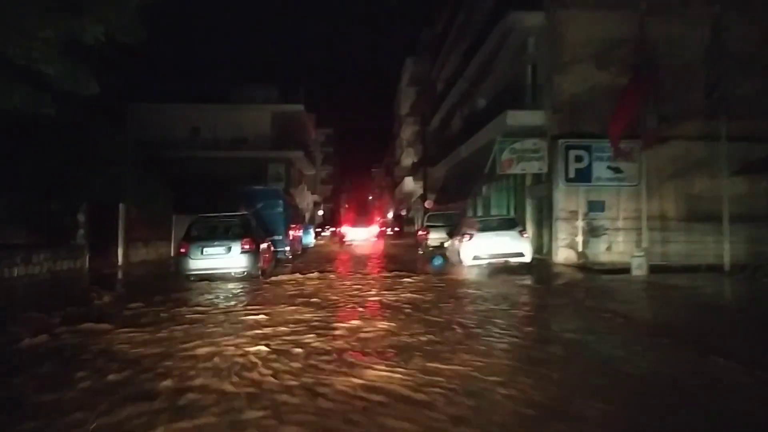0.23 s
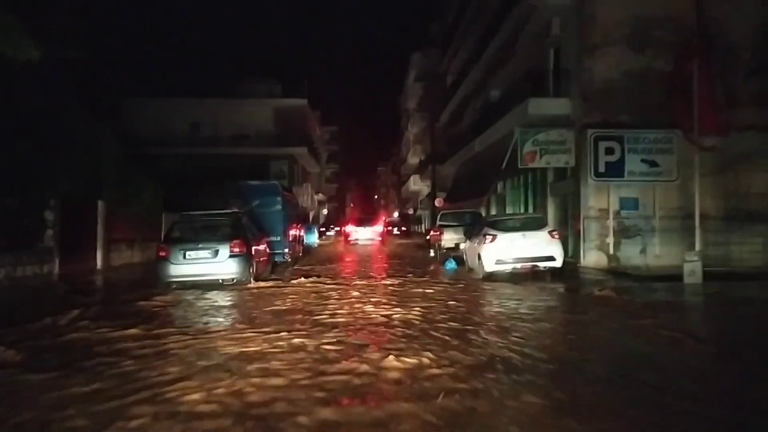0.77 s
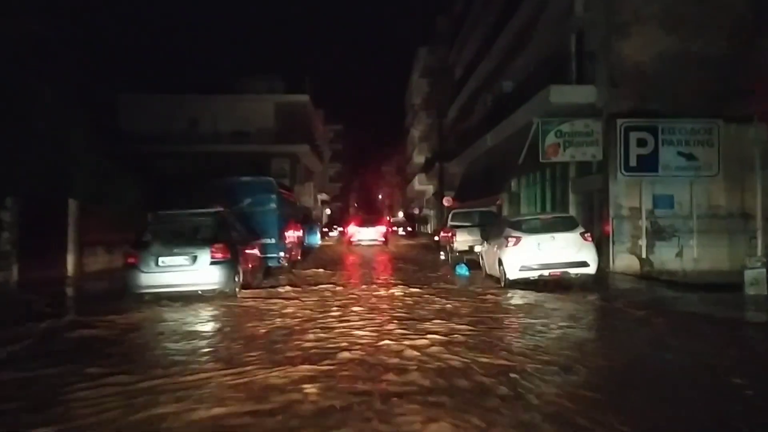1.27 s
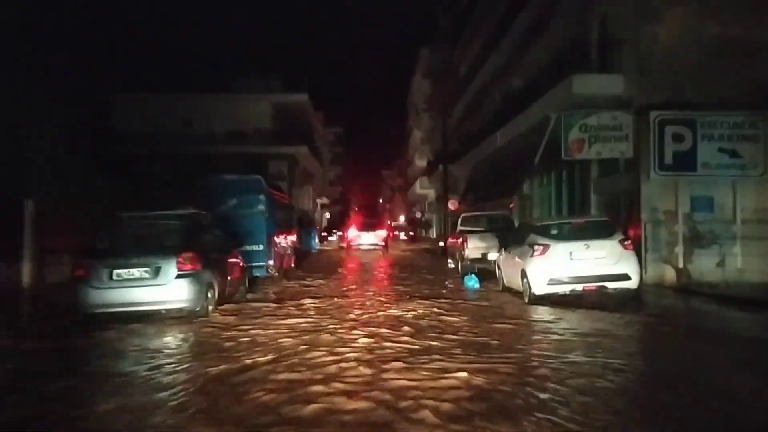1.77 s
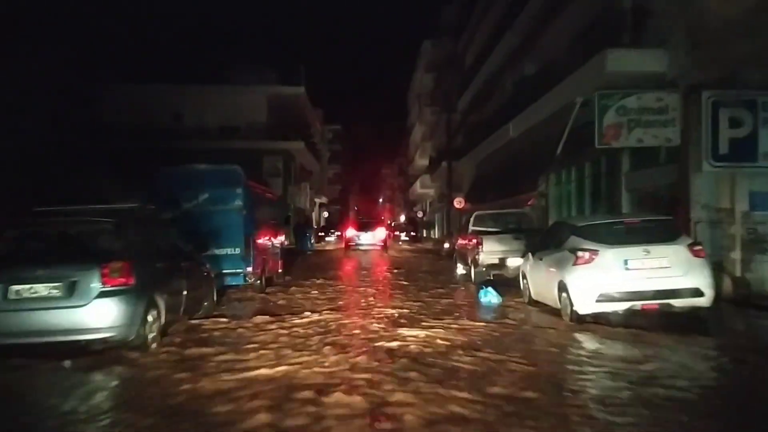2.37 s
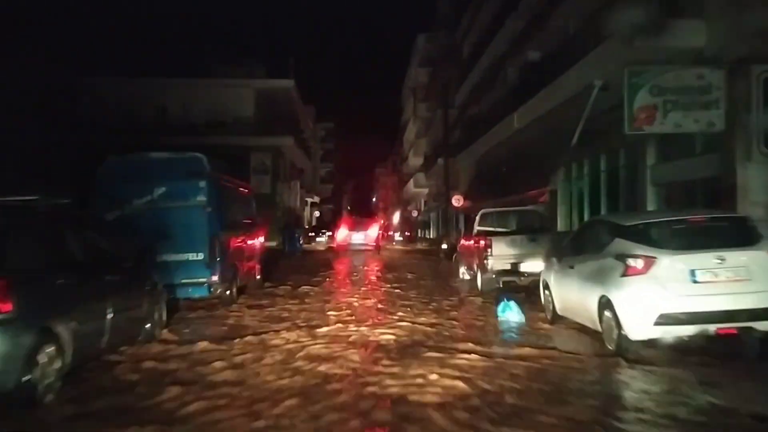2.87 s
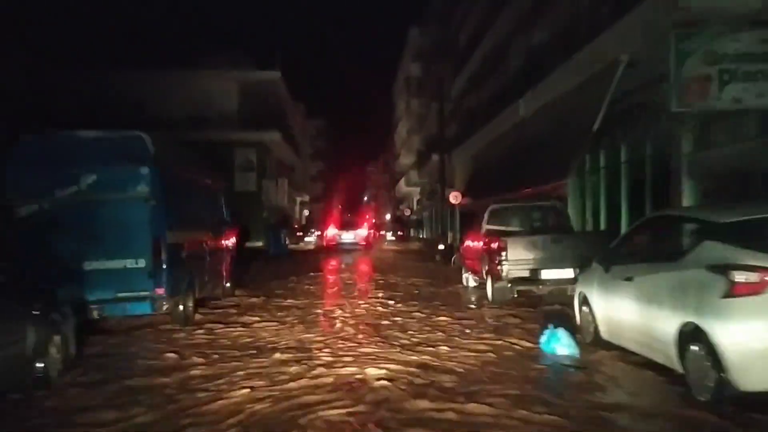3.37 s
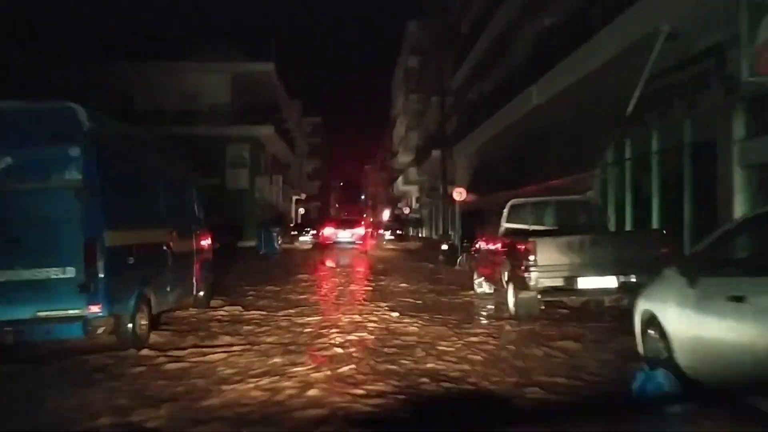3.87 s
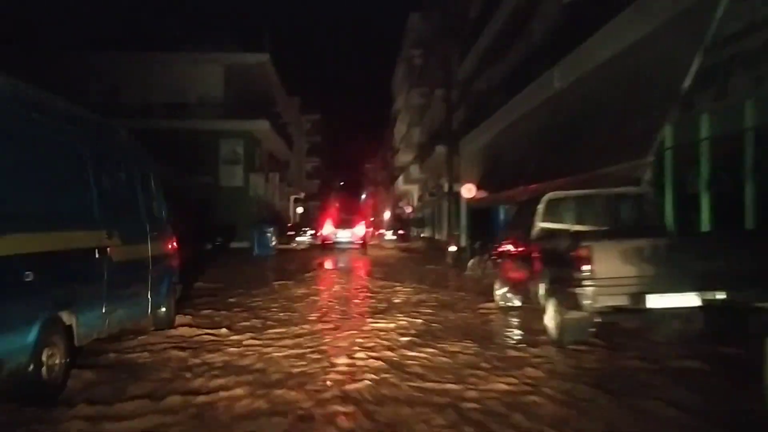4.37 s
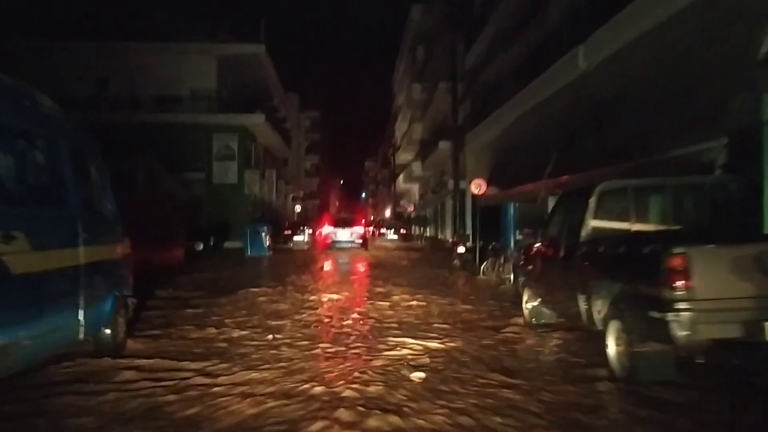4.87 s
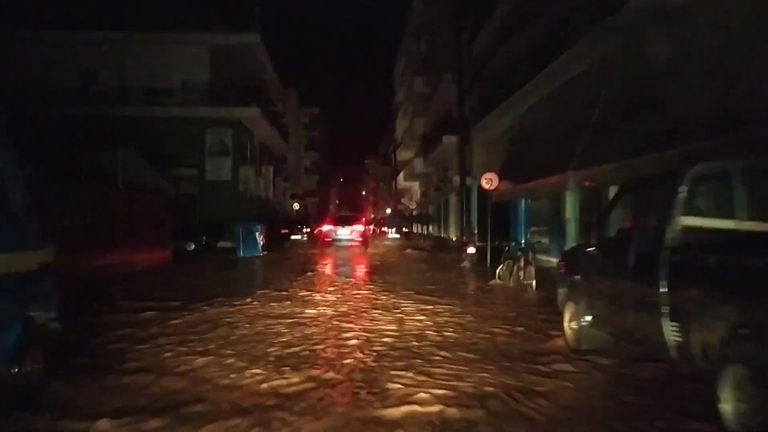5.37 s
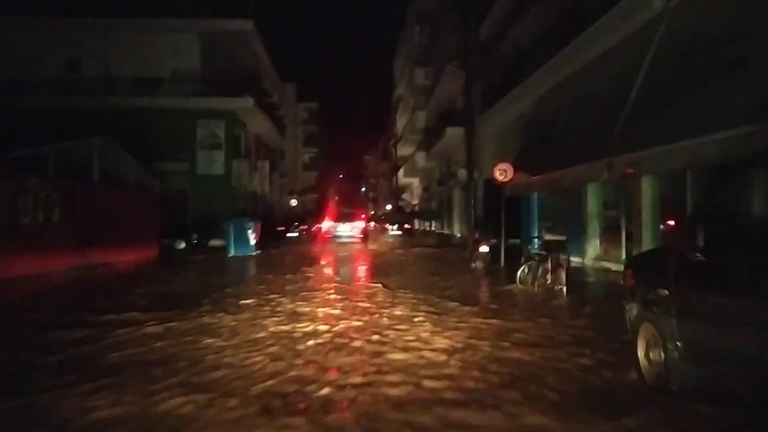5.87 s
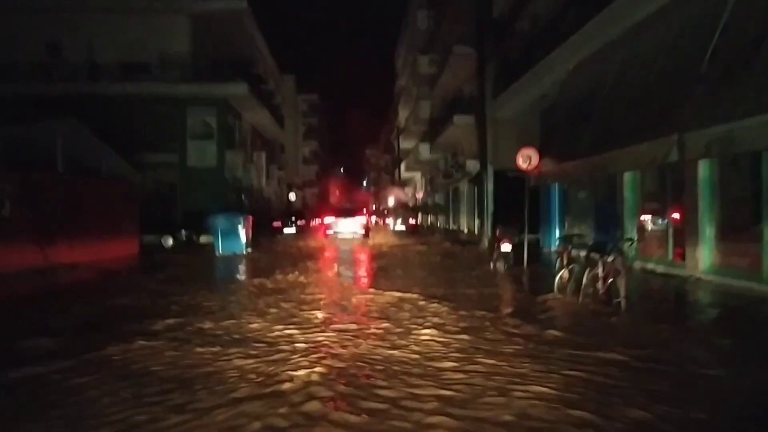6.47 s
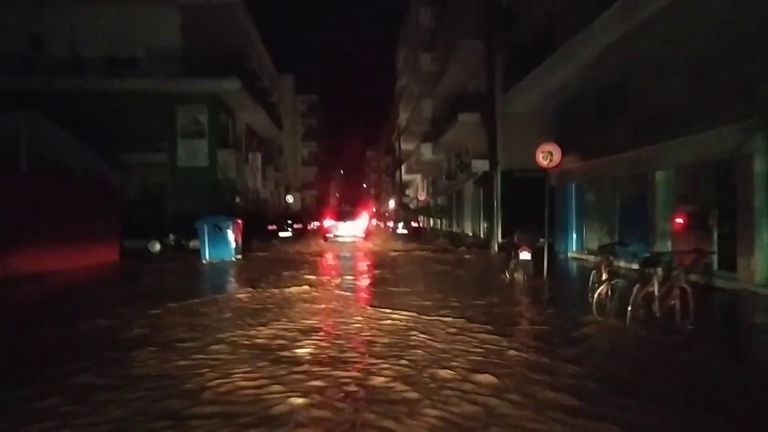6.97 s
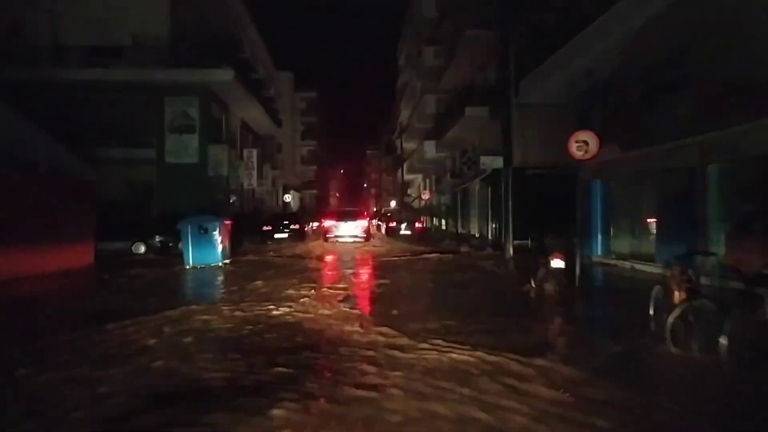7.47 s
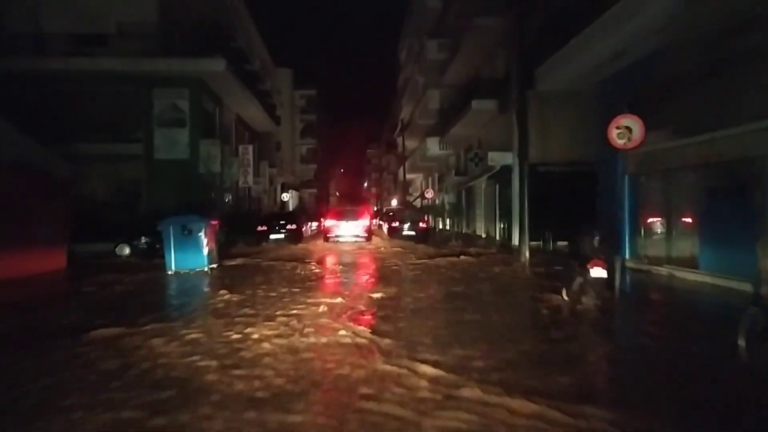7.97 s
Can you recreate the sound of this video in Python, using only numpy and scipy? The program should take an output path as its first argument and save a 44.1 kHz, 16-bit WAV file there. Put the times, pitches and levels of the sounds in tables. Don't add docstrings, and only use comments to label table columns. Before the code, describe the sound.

Muffled car interior: deep engine hum, regular wiper thuds and rubbery stutters, floodwater sloshing and softly hissing along the doors and floor.

```python
import sys
import numpy as np
from scipy import signal
from scipy.fft import rfft, irfft, next_fast_len
from scipy.io import wavfile
from scipy.ndimage import uniform_filter1d, map_coordinates

SR = 44100
rng = np.random.default_rng(int(sys.argv[2]) if len(sys.argv) > 2 else 0)


def decibels_to_gain(level_db):
    exponent = np.asarray(level_db, float) / 20
    return 10 ** exponent


def put_to_file(sound):
    columns = np.atleast_2d(sound).T
    safe = np.clip(columns, -1, 1)
    whole_steps = np.round(safe * 32767)
    wavfile.write(sys.argv[1], SR, whole_steps.astype(np.int16))


N = 362943


def unit(x):
    return x / np.sqrt(np.mean(x ** 2) + 1e-20)


def along(points, hz):
    f, v = np.transpose(points)
    return np.interp(np.log(hz + 1), np.log(f + 1), v)


def curves(rows):
    s, *cols = np.transpose(rows)
    return [np.interp(np.arange(N) / SR, s, c) for c in cols]


def wobble(rate_hz):
    knots = rng.standard_normal(int(N * 60 / SR))
    return map_coordinates(knots, [np.arange(N) * rate_hz / SR])


def bells(middle_s, length_s):
    offset_s = np.arange(N) / SR - np.reshape(middle_s, (-1, 1))
    return (offset_s / (np.reshape(length_s, (-1, 1)) / 2)) ** 2


def filtered(x, response):
    m = next_fast_len(N + SR // 2)
    return irfft(rfft(x, m) * response(np.fft.rfftfreq(m, 1 / SR)), m)[..., :N]


def add(track, s, modes, attack_s):
    t = np.arange(SR // 3) / SR
    ring = sum(decibels_to_gain(db - 60 * t / t60_s) * np.sin(2 * np.pi * hz * t) for hz, db, t60_s in modes)
    start = round(s * SR)
    track[..., start:start + len(t)] += ring * (1 - np.exp(-t / attack_s))


def burst(track, events, spectrum, t60_s, attack_s):
    t, shape = np.arange(SR // 4) / SR, np.zeros(len(track))
    for s, db in events:
        shape[round(s * SR):][:len(t)] += decibels_to_gain(db - 60 * t / t60_s) * (1 - np.exp(-t / attack_s))
    pair = rng.standard_normal(N) + 1.6 * rng.standard_normal((2, N))
    return track[:N] + shape[:N] * unit(filtered(pair, lambda hz: decibels_to_gain(along(spectrum, hz))))


# f/Hz, correlation/1
LIKENESS = [(60, .997), (130, .93), (270, .86), (600, .4), (1250, .4), (2500, .28), (5000, .2), (12000, .2)]


def rush(spectrum, patchy_db, drops_db=-60):
    n = N + 2048
    drops = np.zeros((2, n))
    when, left, right, size = rng.random((4, 4000))
    drops[:, (when * n).astype(int)] = np.array([left - .5, right - .5]) * decibels_to_gain(11.0 * size)
    noise = rng.standard_normal((2, n)) + decibels_to_gain(drops_db) * unit(drops)
    z = signal.stft(noise, nperseg=512)[2]
    field = uniform_filter1d(rng.standard_normal(z.shape[1:]), size=8, axis=0)
    field = uniform_filter1d(field, size=8, axis=1)
    pair = signal.istft(z * decibels_to_gain(patchy_db * unit(field)), nperseg=512)[1][:, :N]

    def colour(hz):
        turn = np.arccos(np.clip(along(LIKENESS, hz), -1, 1)) / 2
        return decibels_to_gain(along(spectrum, hz)) * [np.cos(turn), np.sin(turn)]

    mid, side = filtered(pair, colour)
    return np.array([mid + side, mid - side]) / np.std(mid)


# t/s, f/Hz, level/dB
FIRING = [(0.0, 59, -27), (0.07, 60.2, -28.5), (0.2, 55.5, -25.5), (0.38, 54, -26.5), (0.75, 53.56, -24),
          (1.0, 54.75, -30), (1.7, 53.43, -26.5), (2.3, 55.42, -27.5), (3.2, 56.32, -31),
          (3.9, 54.3, -26.5), (4.7, 50.8, -34), (5.2, 49.65, -49), (5.7, 49.2, -34.5), (6.85, 48.3, -36.5),
          (7.3, 49.2, -42), (8.23, 48.45, -37)]


def engine():
    hz, first_db = curves(FIRING)
    second_db = -41 - 0.13 * np.abs(hz - 51.3)
    drag = uniform_filter1d(np.minimum(decibels_to_gain(grip() + 27.5), 1), size=int(0.37 * SR))
    second_db = second_db + 7 * drag
    turn = 2 * np.pi * np.cumsum(hz * (1 + 0.0027 * wobble(12))) / SR
    lumpy_db = 0.7 + 0.22 * np.clip(-22 - first_db, 0, 12)
    first = decibels_to_gain(first_db + lumpy_db * wobble(24.098)) * (np.sin(turn) + 0.045 * np.sin(turn / 2))
    second = decibels_to_gain(second_db + 0.57 * wobble(13)) * (np.sin(2 * turn + 1) + 0.42 * np.sin(3 * turn))
    return np.sqrt(2) * (first + second)


# t/s, level/dB, ring f/Hz, low thud level/dB, click level/dB
PARK_THUMPS = [
    (0.287, -17.5, 249, 0, -25.5),
    (1.716, -16, 240, 0.5, -26),
    (3.146, -20, 220, -8, -24.5),
    (4.552, -16.5, 278, -11, -25.5),
    (5.979, -17, 272.8, 0.5, -27),
    (7.384, -19.5, 268.4, -13, -23.5),
]
# t/s, level/dB, ring f/Hz, low knock level/dB, bounce delay/s
BLADE_FLIPS = [
    (1.004, -32, 594, 8, 0.047),
    (2.435, -30.5, 584, 12, 0.013),
    (3.849, -22.5, 603, 0, 0.036),
    (5.269, -24, 696, 7, 0.03),
    (6.684, -37, 510, -1, 0.019),
    (8.113, -30, 596, 4, 0.023),
]
# t/s, level/dB, ring f/Hz, ring over rest/dB
FLIP_SNAPS = [
    (1.006, -40, 1740, 0),
    (2.431, -35, 1250, 4),
    (3.848, -29.5, 1300, 9),
    (5.263, -29, 1140, 10),
    (6.678, -33, 1980, -4),
    (8.108, -39, 1860, 4),
]
# f/Hz, level/dB per Hz
SCRAPE = [(350, -24), (650, 0), (1150, -5), (1600, -12), (2400, -17), (4000, -40)]
# f/Hz, level/dB per Hz
SCUTTLE_PANEL = [(60, -30), (110, -17), (200, -1), (280, 18.5), (400, -29), (700, -1.5), (1500, -27),
                 (4000, -35), (9000, -56)]
# f/Hz, level/dB per Hz
LINKAGE = [(300, -25), (700, 11.5), (1500, 4), (2200, -0.5), (3000, -8), (4200, -6.5), (6500, -15),
           (10000, -56)]
# f/Hz, level/dB per Hz
SLAP_SKIN = [(120, -36), (200, -6), (400, -2), (620, -8), (1000, -7), (1400, -23), (2300, -38), (4000, -37),
             (9000, -76)]


def wipers():
    park, flip = np.zeros((2, N + SR))
    for s, db, hz, thud_db, click_db in PARK_THUMPS:
        panel = [(hz, db + 1.5, .13), (hz * 0.677, db - 5, .12), (hz * 1.164, db - 5, .09),
                 (hz * 1.55, db - 9.5, .06), (570, db - 17.5, .08)]
        add(park, s, panel, attack_s=0.0019)
        add(park, s + 0.0199, [(103.7, db + thud_db, 0.14)], attack_s=0.014)
        tick = [(3930, db + click_db - 15, .015), (3930 * 1.12, db + click_db - 13, .012)]
        add(park, s - 0.0072, tick, attack_s=.0004)
    for s, db, hz, low_db, bounce_s in BLADE_FLIPS:
        knock = [(hz, db + 1.5, .055), (hz * 0.77, db + 3, .035), (hz * 0.594, db - 10, .035),
                 (275, db + low_db + 2, .045)]
        add(flip, s, knock, attack_s=0.0036)
        add(flip, s + bounce_s, [(690, db - 7, 0.03)], attack_s=0.0023)
    for s, db, hz, ring_db in FLIP_SNAPS:
        snap = [(960, db - 5, .03), (hz, db + ring_db, .032), (1650, db - 8, .03), (2180, db - 10, .03)]
        add(flip, s, snap, attack_s=0.0059)
    scrapes = [(s, db - 5) for s, db, *_ in FLIP_SNAPS]
    rattles = [(s - .003, db - 16) for s, db, *_ in PARK_THUMPS]
    clicks = [(s - .0075, db + click_db + 5) for s, db, _, _, click_db in PARK_THUMPS]
    slaps_over = [(s - .002, db - 8) for s, db, *_ in BLADE_FLIPS]
    park = burst(park, rattles, SCUTTLE_PANEL, t60_s=0.2, attack_s=0.0017)
    click = burst(np.zeros(N + SR), clicks, LINKAGE, t60_s=0.038, attack_s=0.00061)
    scrape = burst(np.zeros(N + SR), scrapes, SCRAPE, t60_s=0.055, attack_s=0.0036)
    return park + click + scrape + burst(flip, slaps_over, SLAP_SKIN, t60_s=0.11, attack_s=0.0015)


# middle t/s, length/s, level/dB, slip f/Hz
JUDDER_BOUTS = [(0.41, 0.075, -22, 72.5), (0.54, 0.12, -33, 70.6), (0.643, 0.1, -22.5, 76.9),
                (0.749, 0.15, -22, 82.8), (1.85, 0.076, -24.5, 72.84), (1.972, 0.063, -23.5, 69.9),
                (2.152, 0.22, -28, 83.6), (3.194, 0.041, -26.5, 77.8), (3.288, 0.069, -24, 75.1),
                (3.4, 0.072, -45, 71.5), (4.682, 0.1, -26, 69.6), (4.77, 0.13, -25, 72.6),
                (4.835, 0.067, -20, 74), (6.085, 0.12, -24, 85.85), (6.233, 0.049, -52, 77),
                (7.51, 0.13, -25, 80.7), (7.61, 0.24, -25.5, 72.3), (7.696, 0.081, -32, 72),
                (7.763, 0.071, -22, 85.14), (7.93, 0.063, -39, 82.9)]


def grip():
    s, length_s, peak_db, _ = np.transpose(JUDDER_BOUTS)
    return np.max(peak_db[:, None] - 10 * bells(s, length_s), axis=0)


# f/Hz, level/dB
WINDSCREEN = [(40, -37), (75, -5), (150, 8), (190, -4.5), (260, -24), (500, -120)]
# f/Hz, level/dB
WIPER_ARM = [(100, -57), (170, 11), (215, 7.5), (290, -23), (450, -31), (900, -56), (2000, -120)]


def judder():
    s, *_, slip_hz = np.transpose(JUDDER_BOUTS)
    level_db = grip()
    hz = np.interp(np.arange(N) / SR, s, slip_hz)
    arm_db = -6.5 - 0.79 * np.clip(level_db + 27, -20, 9)
    cycles = np.cumsum(hz * (1 + .03 * wobble(40))) / SR
    slips = np.diff(np.floor(cycles), prepend=0) * decibels_to_gain(2.0 * rng.standard_normal(N))

    def shake(body):
        return unit(filtered(slips, lambda f: decibels_to_gain(along(body, f)) * np.exp(-1j * f / 90)))

    return decibels_to_gain(level_db - 11) * (shake(WINDSCREEN) + decibels_to_gain(arm_db) * shake(WIPER_ARM))


# peak t/s, level/dB,
# ring f/Hz
BLADE_GRABS = [(0.026, -26.5, 167), (0.131, -33, 198), (0.327, -20, 104.6), (0.418, -22.5, 151.6),
               (0.419, -30, 296), (0.459, -25, 157), (0.492, -31, 143.6), (0.535, -20, 153.6),
               (0.576, -23, 156), (0.59, -23.5, 217), (0.639, -13.5, 153.5), (0.641, -32, 287),
               (0.687, -27.5, 252), (0.711, -19, 165.3), (0.738, -22.5, 166.4), (0.785, -25, 164),
               (1.431, -24.5, 158.2), (1.952, -25.5, 220.5), (1.968, -37, 130), (1.983, -33.5, 217),
               (1.993, -25, 142), (2.015, -32.5, 215), (2.157, -28, 251.5), (2.462, -30.5, 125.5),
               (2.465, -33, 295), (2.492, -27, 160), (3.178, -26.8, 288), (3.19, -21.5, 172),
               (3.277, -27, 153.3), (4.595, -27.5, 254), (4.595, -20.5, 108.2), (4.629, -30, 281),
               (4.667, -28.5, 133), (4.687, -29.5, 300), (4.707, -25, 215.2), (4.743, -25, 152),
               (4.752, -27.5, 227.4), (4.772, -35.3, 382), (4.783, -22.9, 145), (4.789, -22, 218),
               (4.841, -23.5, 152), (6.109, -28, 152), (6.513, -25, 160), (7.413, -20, 104.7),
               (7.423, -25.5, 216), (7.488, -23, 166), (7.518, -28, 142.2), (7.548, -24.5, 91),
               (7.565, -28, 145), (7.615, -21, 150.6), (7.65, -26.5, 217.5), (7.658, -26, 141),
               (7.681, -27.5, 222), (7.693, -31, 142), (7.755, -23.5, 158), (8.037, -30.5, 341),
               (8.067, -29, 277), (8.108, -28, 132), (8.127, -34, 330), (8.127, -32, 260)]


def grabs():
    out, rise_s = np.zeros(N + SR), 0.012
    for s, db, hz in BLADE_GRABS:
        add(out, s - 1.203 * rise_s, [(hz, db + 8, .13)], attack_s=rise_s)
    return out[:N]


# t/s, level/dB, spring f/Hz, knock level/dB
WHEEL_DROPS = [
    (6.377, -13, 27.7, -10),
]


def bumps():
    out = np.zeros(N + SR)
    for s, db, hz, knock_db in WHEEL_DROPS:
        knock = db + knock_db
        add(out, s, [(hz, db, .65)], attack_s=0.0058)
        axle = [(345, knock + 5.5, 0.088), (240, knock - 10, 0.15), (179.3, knock + 2, 0.23)]
        add(out, s + 0.0036, axle, attack_s=0.0039)
    return -out[:N]


# t/s, level/dB
DOOR_SLAPS = [
    (0.409, -34),
    (1.048, -54),
    (1.623, -51),
    (4.441, -50),
    (4.685, -35),
    (5.219, -52),
    (7.925, -27),
    (8.066, -32),
]
# t/s, level/dB
WATER_SHEETS = [(.06, -58), (.47, -55), (.6, -59), (1.9, -54.5), (3.31, -56), (4.31, -59), (4.73, -54),
                (6.16, -56.5), (7.56, -61)]
# f/Hz, level/dB per Hz
SHEET_HISS = [(2500, -36), (4500, -7), (7000, -12.5), (9300, -7), (11000, -17), (12500, -23), (15000, -62)]
# t/s, level/dB, ring f/Hz
DOOR_PLOPS = [
    (0.284, -34, 586),
    (1.048, -39, 690),
    (1.623, -40, 620),
    (1.71, -37, 600),
    (3.1647, -52, 3770),
    (4.441, -39, 639.4),
    (4.685, -34, 616),
    (5.219, -32, 515),
    (8.066, -33, 688.8),
]
# t/s, level/dB, ring f/Hz
FLOOR_SLOPS = [(1.071, -39, 226), (1.263, -23, 154), (2.299, -25, 150.6), (2.667, -26, 273),
               (2.817, -25, 183), (3.483, -21, 185), (3.523, -28, 203), (3.83, -28, 202), (3.992, -31, 211),
               (4.281, -25, 186), (4.815, -24, 151.7), (5.011, -33, 243), (5.182, -24, 187),
               (5.729, -37.5, 345), (5.769, -29, 183), (6.802, -37, 223), (7.895, -25, 151)]


def slaps():
    plops = np.zeros(N + SR)
    for s, db, hz in DOOR_PLOPS:
        add(plops, s, [(hz, db + 0.5, .04)], attack_s=0.0019)
    for s, db, hz in FLOOR_SLOPS:
        add(plops, s, [(hz, db + 2, 0.13)], attack_s=.005)
    hits = burst(plops, [(s, db - 4) for s, db in DOOR_SLAPS], SLAP_SKIN, t60_s=0.11, attack_s=0.0017)
    return hits + burst(np.zeros(N + SR), WATER_SHEETS, SHEET_HISS, t60_s=0.41, attack_s=0.011)


# t/s, level/dB, ring f/Hz, broad crack level/dB, left over right/dB
CLIP_TICKS = [(0.092, -56, 9000, -2.5, -3), (0.512, -58, 8800, -6, -5), (0.611, -53, 8400, -3.5, -2),
              (0.155, -50, 9300, -19, -12), (0.4733, -53, 9540, -8, -14), (0.721, -44, 9530, -12, -18.5),
              (0.8076, -49, 9350, -11, -12), (0.9842, -48, 9460, -14, -10), (1.1477, -50.5, 9336, -7, -3),
              (1.4081, -49, 9440, -12, -19), (1.5508, -45.5, 9580, -16, -17), (1.6404, -52, 9400, -11, -12),
              (1.8287, -46, 9480, -17, -15), (2.437, -50, 9600, -14, -13), (3.29, -47.5, 9620, -14, -19),
              (3.4385, -48, 10000, -4, -7), (3.6404, -52.5, 10370, -6.5, -5), (3.7, -41, 9570, -25, -19),
              (3.8018, -57, 9050, -4.5, -6), (4.323, -55, 9640, -8, -3), (5.5804, -52.5, 10460, -3.5, -1),
              (6.3954, -54.5, 9650, -3.5, -4.0), (6.5261, -50, 9700, -12, -12),
              (6.788, -57, 9770, -5.5, -14)]


def trim():
    out = np.zeros((2, N + SR))
    grit = rng.standard_normal((len(CLIP_TICKS), 300)) * decibels_to_gain(-60 * np.arange(300) / SR / 0.013)
    for (s, db, hz, crack_db, pan_db), noise in zip(CLIP_TICKS, grit):
        one = np.zeros(SR // 2)
        modes = [(hz, db - 5, .03), (hz * 1.04, db - 13, .025), (hz * .95, db - 10, .025)]
        add(one, 0, modes, attack_s=0.00055)
        one[:299] += decibels_to_gain(db + 2 * crack_db + 16) * (noise[1:] - .4 * noise[:-1])
        start = round(s * SR)
        out[:, start:start + len(one)] += one * decibels_to_gain([[pan_db / 2], [-pan_db / 2]])
    return filtered(out[:, :N], lambda f: 1 / np.sqrt(1 + (f / 11800) ** 8.8))


# f/Hz, level/dB per Hz
RUBBER = [(60, -32), (110, -17), (200, 1.5), (320, -9), (500, -19.5), (1000, -38), (2000, -120)]


def scrub():
    level = uniform_filter1d(decibels_to_gain(grip() - 10.5), size=int(0.098 * SR))
    return level * rush(RUBBER, patchy_db=2.0)


# t/s, level/dB
FLOW = [(0.0, -53), (0.66, -51), (1.37, -54.5), (1.79, -53), (2.22, -54), (2.56, -53), (2.98, -53.5),
        (3.12, -52), (3.99, -52), (4.22, -52.5), (4.7, -51), (5.02, -52), (5.89, -52), (6.12, -51.5),
        (6.99, -53), (7.52, -51.5), (7.98, -50), (8.23, -52)]
# middle t/s, sway lift/dB, length/s, floor pan lift/dB
WAVES = [(0.0, 19, 0.099, 1.5), (0.396, 8, 0.77, 2.5), (0.96, 3, 0.087, 0.5), (1.235, 1.5, 0.28, -1.5),
         (1.44, 1, 0.18, 0.5), (2.1, 0, 0.15, 1.5), (2.44, 4, 0.18, 2), (2.652, -3, 0.36, -1),
         (2.915, 5, 0.53, 1.5), (3.517, 9.5, 0.19, 2.5), (4.12, 8, 0.79, 0.5), (4.743, 8, 0.11, 3.5),
         (5.104, 0, 0.47, -1), (5.433, 10.5, 0.19, -0.5), (5.756, 3.5, 0.4, 0), (5.995, 9, 0.17, 1),
         (6.485, 6, 0.099, 0.5), (6.685, 6, 0.061, 5), (7.13, 6.5, 0.13, -0.5), (7.58, 6.5, 0.13, 1),
         (7.953, -1, 0.37, 1), (8.06, 0, 0.064, -1)]
# f/Hz, level/dB per Hz
BODY_SWAY = [(12, -18.5), (22, 3.5), (34, 1.5), (48, -13), (70, -64)]
# f/Hz, level/dB per Hz
PAN_WASH = [(35, -66), (60, -5), (178, -2), (296, -10.5), (359, -10), (900, -32), (1170, -67), (1980, -120)]
# f/Hz, level/dB per Hz
DOOR_WASH = [(350, -17.5), (600, -6), (698, -2.5), (869, -9), (978, -4), (1250, -10.5), (1520, -15),
             (1950, -14), (2400, -15.5), (2900, -20), (4500, -29.5), (5850, -52), (9900, -120)]
# f/Hz, level/dB per Hz
SPRAY_HISS = [(1880, -18), (3200, -2.5), (4390, 0), (6960, -7.5), (9330, -6), (10300, -9.5), (10900, -13),
              (11400, -20.5), (12400, -29), (12600, -39), (16400, -66), (22000, -120)]


def water():
    flow_db, = curves(FLOW)
    flow_db = flow_db - flow_db.mean()
    s, lift_db, length_s, slosh_db = np.transpose(WAVES)
    swell = np.exp(-bells(s, length_s))
    deeper_db = 0.25 * (np.arange(N) - N / 2) / SR
    slop = 1.8 * np.tanh(wobble(9) / 2.5)
    sway_db = -39 + lift_db @ swell
    pan_db = -32.5 + 0.21 * flow_db + slosh_db @ swell + 1.68 * slop
    doors_db = -51.16 + 0.88 * flow_db + 0.78 * slop
    spray_db = -63.5 + 0.53 * flow_db + deeper_db + 0.19 * slop + 0.57 * wobble(18)
    sway = decibels_to_gain(sway_db) * rush(BODY_SWAY, patchy_db=1.9)
    pan = decibels_to_gain(pan_db) * rush(PAN_WASH, patchy_db=0.98)
    doors = decibels_to_gain(doors_db) * rush(DOOR_WASH, patchy_db=0.97, drops_db=-7)
    spray = decibels_to_gain(spray_db) * rush(SPRAY_HISS, patchy_db=1.15, drops_db=-17)
    return sway + pan + doors + spray


# f/Hz, left over right/dB
PORT_TILT = [(60, 4.5), (110, 6), (200, 6.5), (350, 5), (640, 4), (1150, 4), (2070, 5), (3740, 0.5),
             (6760, -0.5), (12200, -6)]
# f/Hz, left lead/rad
PORT_LEAD = [(25, -.06), (60, -.17), (200, -.35), (520, -.4), (800, -1.2), (1210, -3.5), (2330, -7.5),
             (4050, -12.4), (12000, -37)]


def scene():
    cabin = engine() + wipers() + judder() + grabs() + bumps() + slaps() + scrub() + water()

    def ports(hz):
        balance = decibels_to_gain(np.outer([.5, -.5], along(PORT_TILT, hz)))
        lead = np.exp(np.outer([.5j, -.5j], along(PORT_LEAD, hz)))
        return balance * lead * (hz < 13200)

    return decibels_to_gain(-0.28) * filtered(cabin, ports) + trim()


def roll_off(x):
    return signal.sosfilt(signal.butter(12, 13000, fs=SR, output="sos"), x)


def record(dry):
    return roll_off(dry)


dry = scene()
out = record(dry)
put_to_file(out)
```